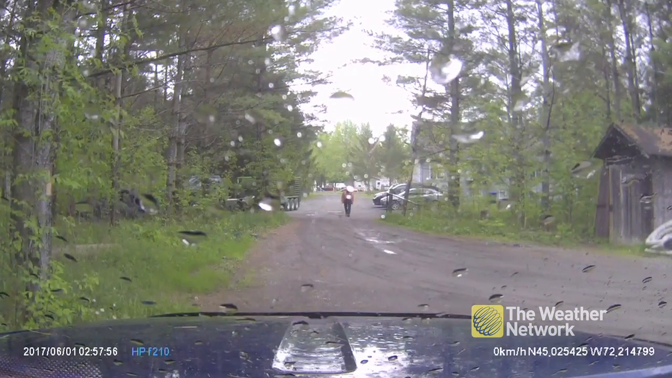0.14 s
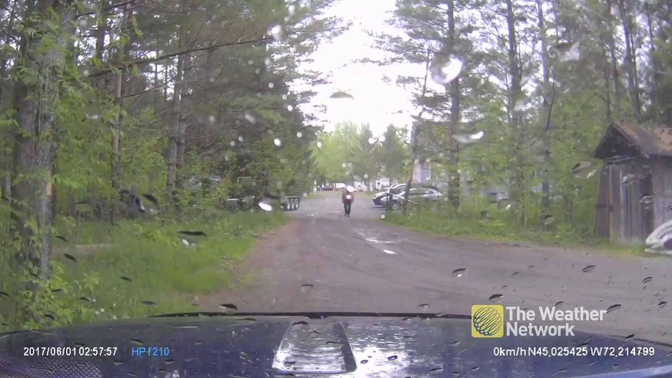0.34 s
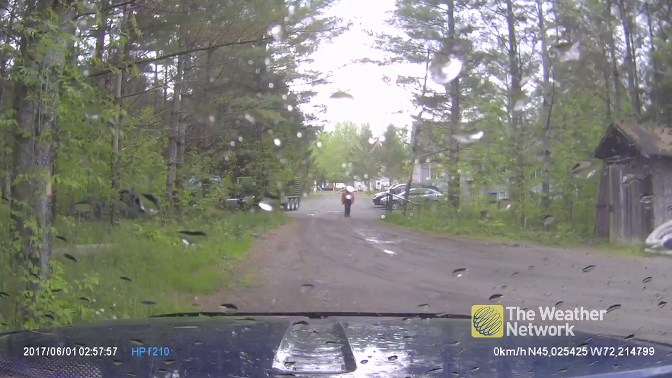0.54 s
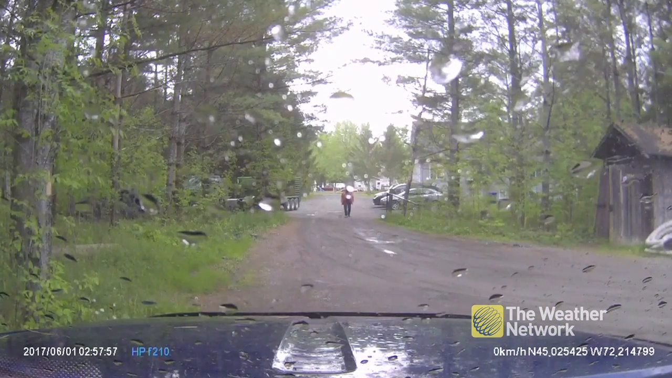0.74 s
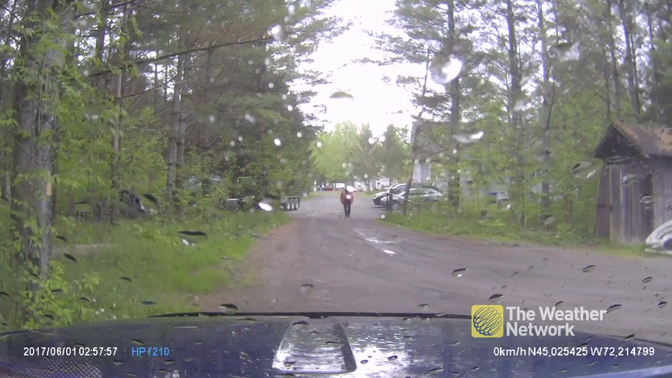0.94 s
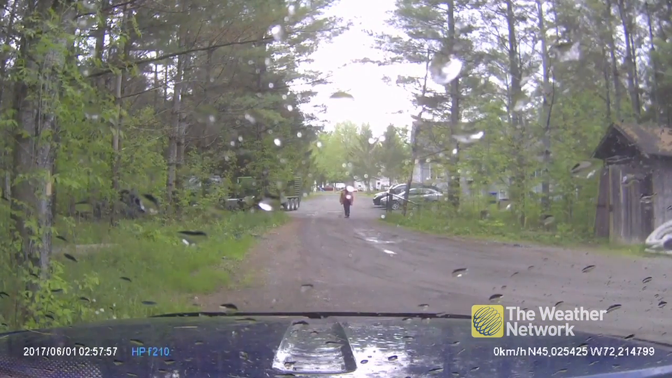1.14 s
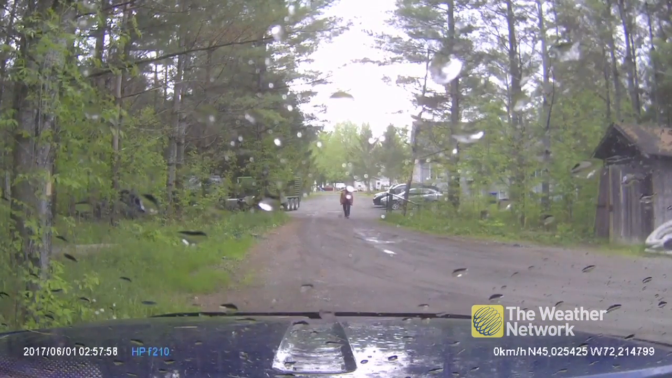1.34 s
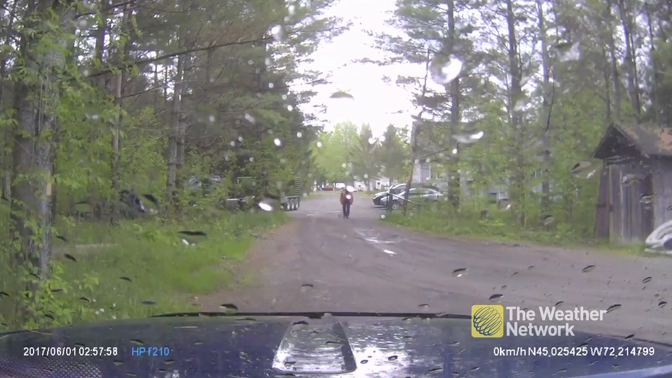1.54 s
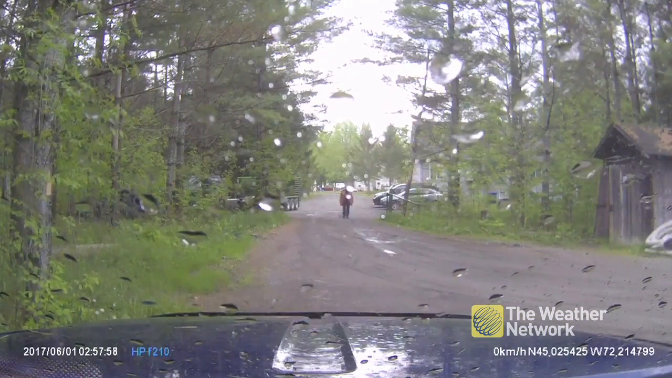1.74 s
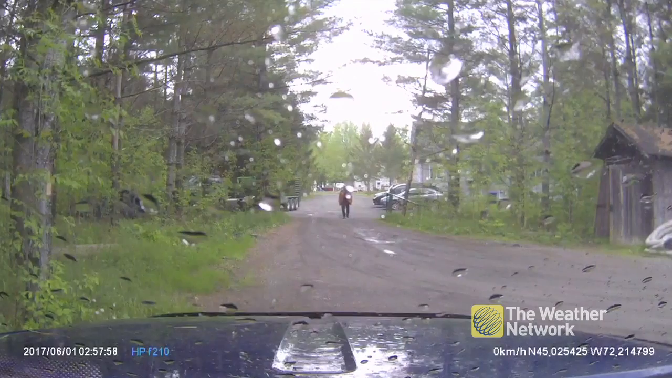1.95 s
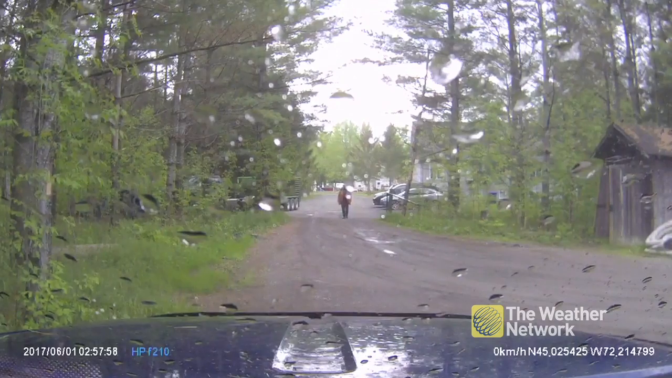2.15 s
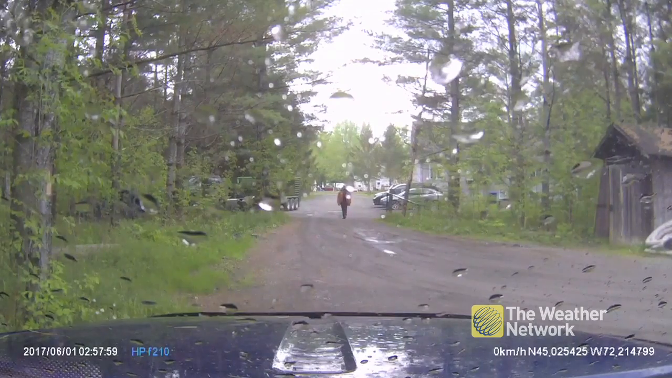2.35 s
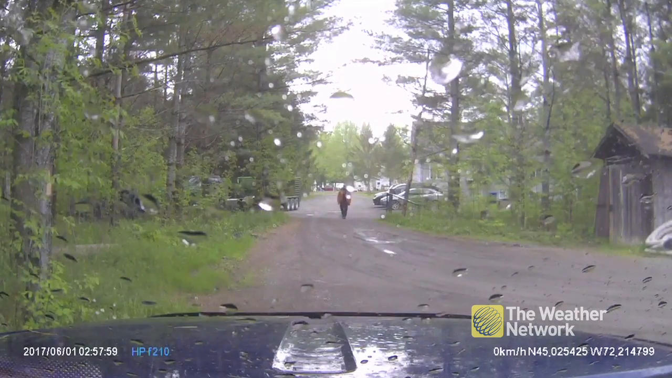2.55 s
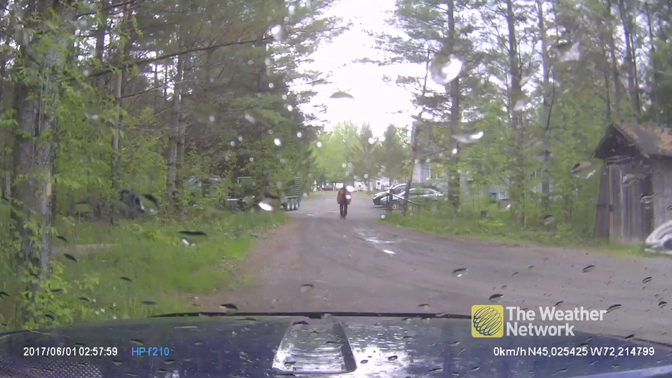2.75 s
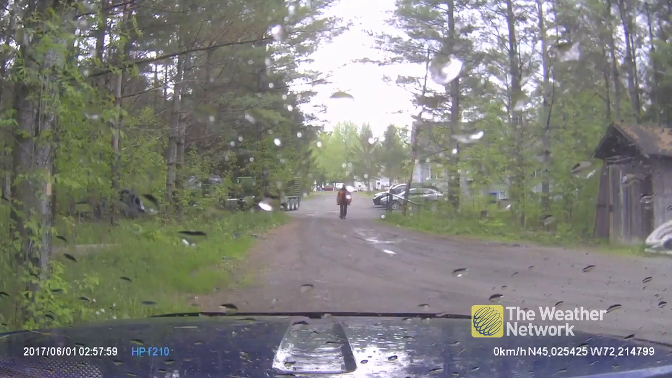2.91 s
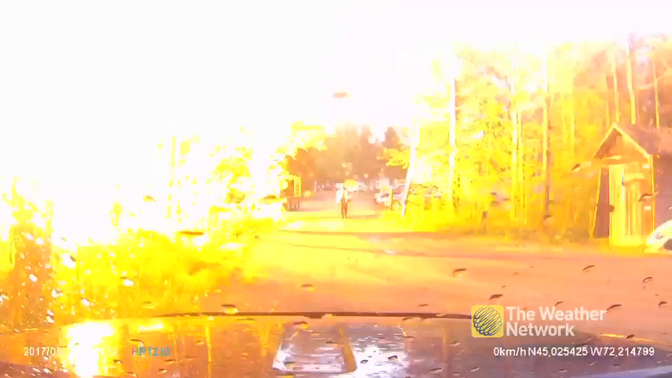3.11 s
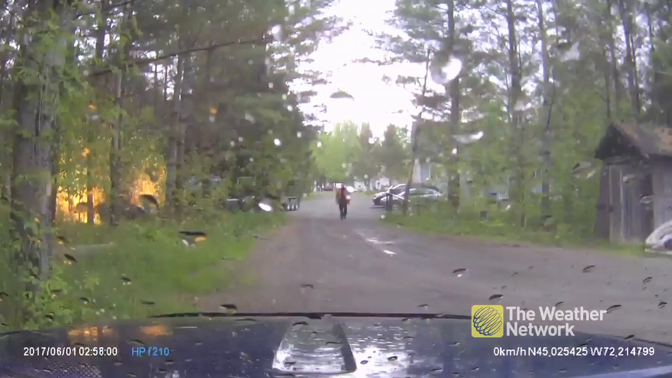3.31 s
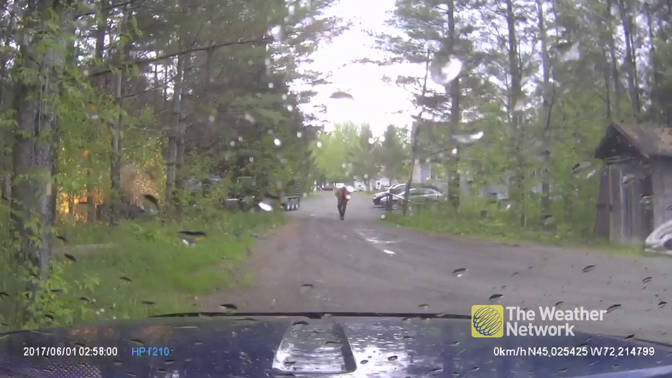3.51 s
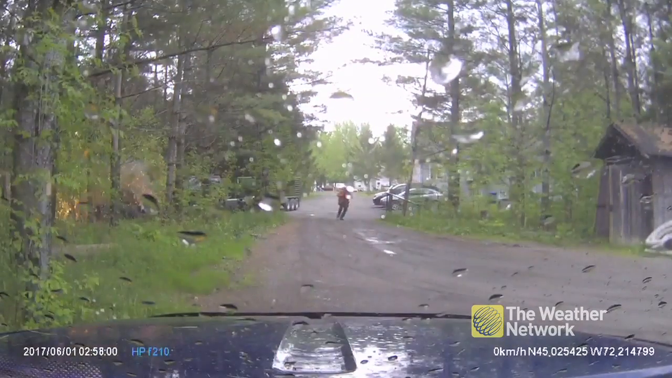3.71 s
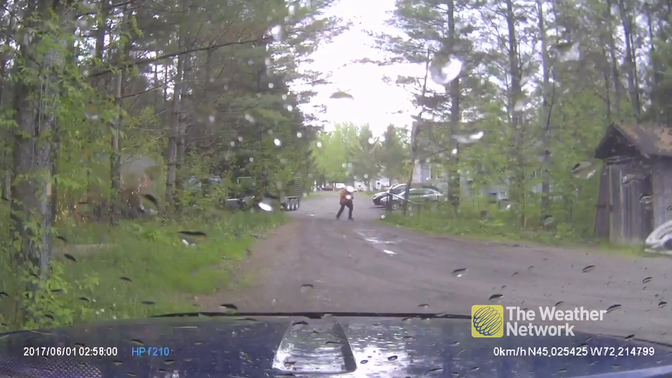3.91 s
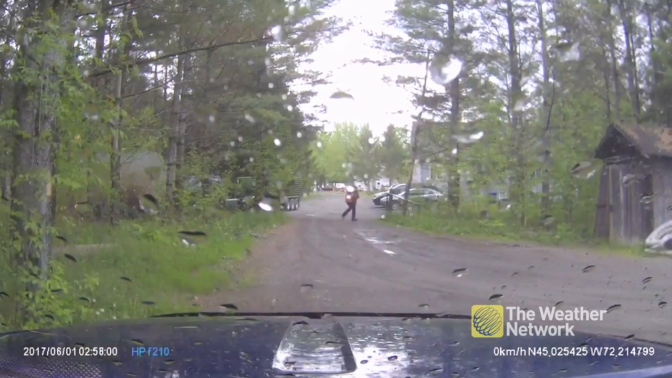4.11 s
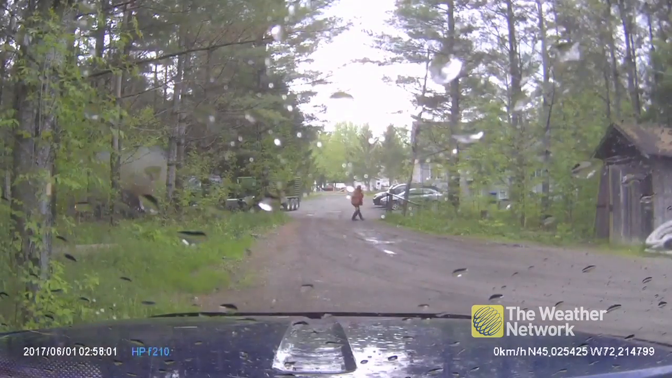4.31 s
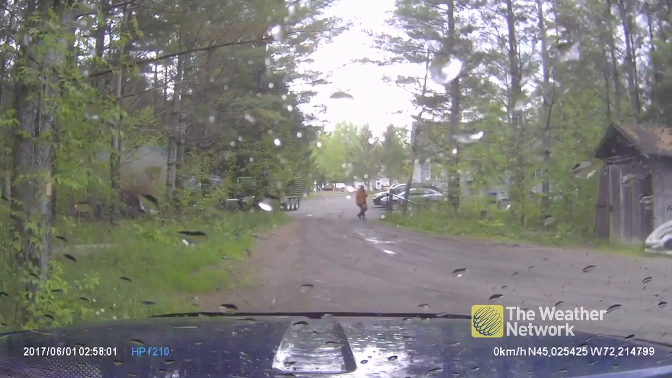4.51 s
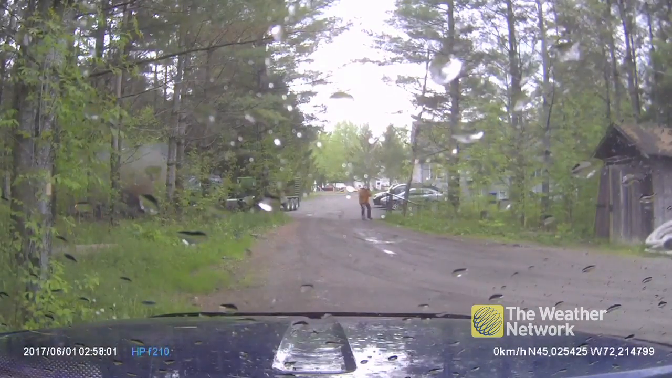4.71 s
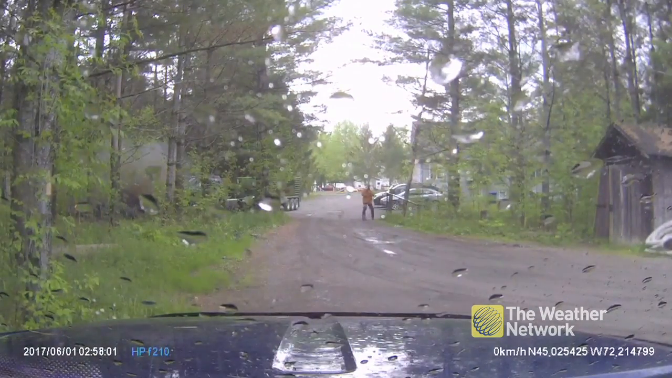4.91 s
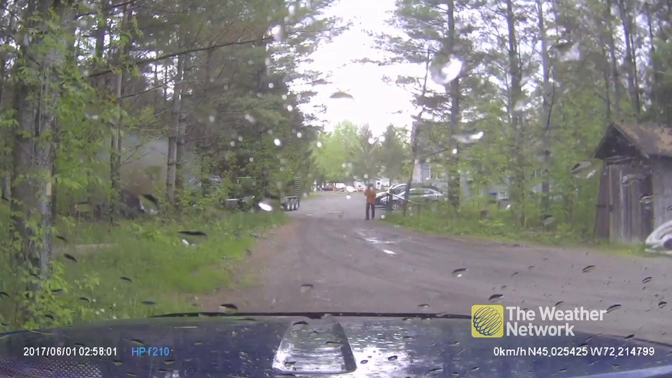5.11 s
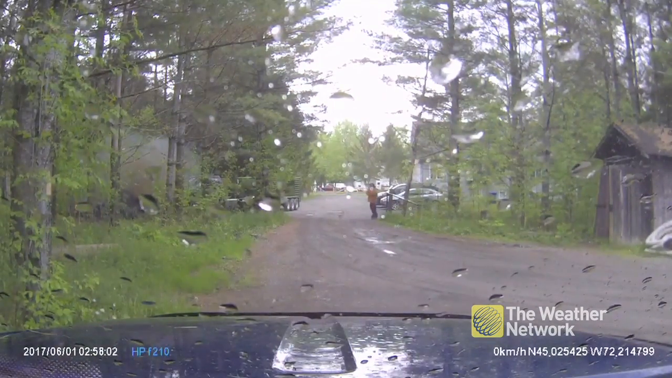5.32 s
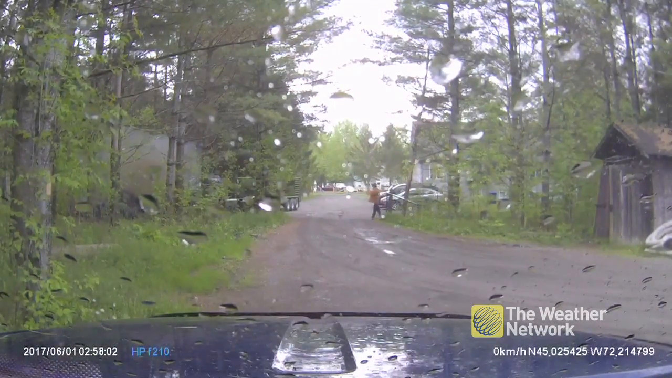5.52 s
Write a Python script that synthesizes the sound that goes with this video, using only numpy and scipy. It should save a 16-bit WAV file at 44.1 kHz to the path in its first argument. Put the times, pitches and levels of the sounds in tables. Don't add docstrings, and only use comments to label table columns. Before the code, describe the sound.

A cheap dashboard microphone in a small car cabin picks up soft rain hiss and scattered ticking drops for three seconds. Lightning strikes close by: a tiny sizzle, then an abrupt clipped blast with broken dropouts. Boxy, rattling thunder fades quickly, rolls back more softly with low thuds, and a few last drops tick through the tail.

```python
import sys
import numpy as np
from scipy import signal
from scipy.fft import rfft, irfft, next_fast_len
from scipy.io import wavfile
from scipy.ndimage import uniform_filter1d, map_coordinates

SR = 44100
rng = np.random.default_rng(int(sys.argv[2]) if len(sys.argv) > 2 else 0)


def unload_audio(sound):
    columns = np.transpose(np.atleast_2d(sound))
    steps = np.round(np.clip(columns, -1, 1) * 32767)
    wavfile.write(sys.argv[1], SR, steps.astype(np.int16))


def boost_factor(decibels):
    exponent = np.asarray(decibels, float) / 20
    return 10 ** exponent


N = 249473

# (frequency [Hz], density [dB per Hz])
DROP_SPECTRUM = [(59, -67), (100, -35), (283, -7.5), (560, -10.5), (1060, -3), (1940, -7.5), (2620, -5.5),
                 (3330, -7), (7270, -17.5), (12000, -34), (15600, -66), (22000, -120)]
# (frequency [Hz], density [dB per Hz])
SHELL_SPECTRUM = [(59, -41), (110, -14.5), (200, -8), (340, -2.5), (580, -3), (950, -1), (1450, -3),
                  (1750, -8.5), (3030, -13), (3350, -15), (4300, -15.5), (4900, -20), (6500, -21),
                  (7500, -31), (15800, -59)]
STRIKE_S = 3.194


def unit(x):
    return x / np.sqrt(np.mean(x ** 2) + 1e-20)


def along(points, hz):
    f, v = np.transpose(points)
    return np.interp(np.log(hz + 1), np.log(f + 1), v)


def wobble(rate):
    knots = rng.standard_normal(int(N * rate / SR) + 4)
    return map_coordinates(knots, [np.arange(N) * rate / SR])


def filtered(x, gain):
    m = next_fast_len(N + 8192)
    return unit(irfft(rfft(x, m) * gain(np.fft.rfftfreq(m, 1 / SR)), m)[:N])


def coloured(x, spectrum):
    return filtered(x, lambda hz: boost_factor(along(spectrum, hz)))


def scattered(per_s, spread_db, t60):
    hit, size = rng.random((2, N))
    power = (hit < per_s / SR) * boost_factor(-2 * spread_db * np.log(size + 0.027))
    fall = boost_factor(-120 * np.arange(SR // 4) / SR / t60)
    envelope = np.sqrt(np.abs(signal.fftconvolve(power, fall)[:N]))
    return unit(envelope * rng.standard_normal(N))


def knocks(events, spectrum, rise_s, mottle_db):
    # (frequency [Hz], t60 [s])
    cabin_t60 = [(150, 0.38), (1000, 0.15), (2700, 0.16), (6000, 0.11), (12000, 0.057)]
    out, length = np.zeros(N + SR), SR // 5
    noise = rng.standard_normal((len(events), length))
    hz, t, z = signal.stft(noise, SR, nperseg=256, noverlap=192)
    mottle = rng.standard_normal((len(events), len(hz)))
    rise = 1 - np.exp(-np.arange(length) / (rise_s * SR))
    t60 = along(cabin_t60, hz)[:, None]
    for k, (s, db, low_db, high_db, ring, panel_hz) in enumerate(events):
        tilt = along([(60, low_db + 20.5), (330, low_db), (750, 0), (1500, 0.0043), (3200, high_db)], hz)
        colour = boost_factor(along(spectrum, hz) + tilt + mottle_db * mottle[k])
        colour = colour * (1 + 1.15 / (1 + ((hz - panel_hz) / 170) ** 2))
        decay = boost_factor(-60 * t / (max(ring, .2) * t60))
        burst = signal.istft(z[k] * colour[:, None] * decay, SR, nperseg=256, noverlap=192)[1][:length]
        burst = rise * burst
        out[round(s * SR):][:length] += boost_factor(db) * burst / np.abs(burst).max()
    return signal.sosfilt(signal.butter(4, 190, "high", fs=SR, output="sos"), out[:N])


def rain():
    # (frequency [Hz], density [dB per Hz])
    hiss_spectrum = [(15, -45), (30, -24), (60, -19), (100, -23), (170, -18), (342, -6.5), (980, -1),
                     (1320, -0.5), (2900, -4), (4500, -6), (6700, -7.5), (7800, -9.5), (14600, -16),
                     (15800, -18)]
    steady = coloured(rng.standard_normal(N), hiss_spectrum)
    patter = coloured(scattered(per_s=60, spread_db=2.5, t60=.12), DROP_SPECTRUM)
    return near_drops() + boost_factor(-65.5) * patter + boost_factor(-54.98 + 0.13 * wobble(6.0)) * steady


def near_drops():
    # (time [s], peak [dB], panel [Hz])
    heavy_drops = [(0.149, -40, 1460), (0.173, -37, 1320), (0.219, -35, 1490), (0.311, -35, 1630),
                   (0.428, -38, 1360), (0.632, -36, 990), (0.674, -37.5, 773), (0.928, -38, 1490),
                   (1.003, -36.5, 1120), (1.159, -35, 1180), (1.259, -34, 830), (1.556, -25.5, 1150),
                   (1.784, -37, 1150), (1.81, -27.5, 1220), (1.85, -36.5, 800), (2.025, -29, 1180),
                   (2.04, -38, 1070), (2.163, -29.5, 1480), (2.188, -44.5, 1080), (2.629, -34, 1284),
                   (2.653, -33.5, 1170), (2.722, -29, 1070), (2.788, -41, 829), (2.824, -35, 1290),
                   (2.968, -40.5, 1290), (2.999, -39.5, 1290), (3.054, -40.5, 1480)]
    # (time [s], peak [dB])
    light_drops = [(0.06, -45), (0.259, -41.5), (0.553, -41.5), (0.61, -43), (0.788, -44), (1.229, -42),
                   (1.619, -47), (1.738, -52), (1.939, -39), (1.964, -46), (2.221, -47), (2.861, -41.5)]
    # (time [s], peak [dB])
    glass_taps = [(0.873, -43), (1.462, -37), (2.27, -42.5), (2.362, -37.5), (2.446, -42.5)]
    # (time [s], treble peak [dB])
    late_drops = [(4.6925, -65), (4.952, -49), (5.1616, -49), (5.254, -50), (5.3523, -48), (5.4158, -42.5),
                  (5.434, -50), (5.5653, -52)]
    # (time [s], peak [dB], panel [Hz])
    roof_thuds = [(2.029, -45, 310), (2.771, -43, 650)]
    sized = heavy_drops + [(s, db, 1150) for s, db in light_drops]
    vary_db = 1.5 * rng.standard_normal((len(sized), 2))
    early = []
    for (s, db, panel_hz), (low_vary, high_vary) in zip(sized, vary_db):
        knock_db = -4.5 - .3 * (db + 35) + low_vary
        splash_db = -3 + 0.13 * (db + 31.5) + high_vary
        early.append((s, db, knock_db, splash_db, 0.86, panel_hz))
    taps = [(s, db, -8, -3, 0.23, 1280) for s, db in glass_taps]
    late = [(s, db + 16.5, -6, 6, .8, 2700) for s, db in late_drops]
    thuds = [(s, db, 8, -14, .8, panel_hz) for s, db, panel_hz in roof_thuds]
    return knocks(early + taps + late + thuds, DROP_SPECTRUM, rise_s=0.0004, mottle_db=1.5)


def whine():
    return boost_factor(-61.5 + 0.38 * wobble(12)) * np.sin(2 * np.pi * 7155 * np.arange(N) / SR)


def leader():
    # (time [s], peak [dB])
    crackles = [(3.135, -35), (3.143, -68), (3.156, -34), (3.168, -35), (3.172, -48)]
    steps = [(s, db - 9, -3, 9, .5, 2700) for s, db in crackles]
    return knocks(steps, SHELL_SPECTRUM, rise_s=.0004, mottle_db=1.5)


def thunder_level():
    # (time [s], level [dB])
    clap = [(3.15, -70), (3.176, -53), (3.182, -28.5), (3.19, -28), (3.194, -10), (3.28, -4.5)]
    # (time [s], level [dB])
    roll = [(3.299, -13.5), (3.5, -17), (3.622, -18), (3.838, -24.5), (3.996, -28), (4.15, -32),
            (4.376, -34), (4.6, -32.5), (5.657, -37.5)]
    s, db = np.transpose(clap + roll)
    return np.interp(np.arange(N) / SR, s, db)


def thunder(level_db):
    train = scattered(per_s=400, spread_db=0.5, t60=0.22)
    roll = boost_factor(level_db + 0.61 * wobble(24.97)) * coloured(train, SHELL_SPECTRUM)
    hz, t, z = signal.stft(roll + peals(), SR, nperseg=256)
    treble_db = 5 - 6 * np.log2(1 + np.maximum(t - STRIKE_S, 0) / 0.24)
    treble_db = treble_db + np.select([t < STRIKE_S, t < 3.29], [5.5, -3.5])
    slope = np.clip((hz[:, None] - 1200) / 3800, 0, 2.4) ** 0.88
    dulled = signal.istft(z * boost_factor(treble_db * slope), SR, nperseg=256)[1][:N]
    return causal(dulled, lambda hz: resonances(hz, depth=0.55)) * np.std(dulled)


def peals():
    # (time [s], peak [dB], panel [Hz])
    shocks = [(3.486, -7.5, 1230), (3.633, -9, 905), (3.879, -11, 1000), (3.899, -10, 428),
              (3.962, -18, 1280), (4.218, -23, 1250), (4.264, -28.5, 1310), (4.344, -26.5, 1210),
              (4.377, -24.5, 1290), (4.392, -25, 1010), (4.444, -35, 1250), (4.579, -36, 700),
              (4.8, -19, 815), (4.819, -16.5, 1380), (4.868, -16.5, 1020), (4.911, -19.5, 1240),
              (4.94, -17, 950), (4.984, -13, 1210), (5.001, -12.5, 417), (5.024, -21, 656),
              (5.125, -27, 1260), (5.151, -26, 885), (5.209, -20.5, 312), (5.234, -24.5, 760),
              (5.376, -16, 636), (5.42, -25, 296), (5.469, -28.5, 474), (5.548, -26, 538),
              (5.576, -27.5, 363), (5.633, -24, 312)]
    s, db, panel_hz = np.transpose(shocks)
    octaves_down = np.log2(1250 / panel_hz)
    far = s > 4.7
    low_db = np.minimum(-17 + 13.5 * octaves_down + 13.5 * far, 5.5)
    high_db = 3 - 2.5 * octaves_down - 5 * far
    ring = 0.96 - 0.14 * octaves_down
    blows = np.transpose([s, db + 1.0, low_db, high_db, ring, panel_hz])
    return knocks(blows, SHELL_SPECTRUM, rise_s=0.0014, mottle_db=5.0)


def resonances(hz, depth):
    # (frequency [Hz], width [Hz], level [dB])
    modes = [(316, 23, 3), (424.5, 26, 1), (683, 53, 0.5), (856, 110, 2), (1006, 50, 3), (1249, 52, 9.5),
             (1490, 19, 8), (2720, 600, 8), (3050, 120, 5.5)]
    return 1 + depth * sum(boost_factor(db) / (1 + (2 * (hz - centre) / width) ** 2) for centre, width, db in modes)


def causal(x, gain):
    m = 2 * next_fast_len(N // 2 + 4096)
    cepstrum = irfft(np.log(gain(np.fft.rfftfreq(m, 1 / SR))), m)
    cepstrum[1:m // 2] *= 2
    cepstrum[m // 2 + 1:] = 0
    return unit(irfft(rfft(x, m) * np.exp(rfft(cepstrum)), m)[:N])


def rumble(level_db):
    # (frequency [Hz], density [dB per Hz])
    boom_spectrum = [(8.8, -46.5), (15, -23), (43, -16), (75, -8.5), (108, -31), (200, -12.5), (260, -25),
                     (440, -120)]
    far_db = 9.5 * np.maximum(np.arange(N) / SR - 4.1, 0)
    boom = coloured(rng.standard_normal(N), boom_spectrum)
    return boost_factor(level_db - 37.5 + far_db + 3.3 * wobble(4.32)) * boom


def scene():
    gain = boost_factor(-9.5 * (np.arange(N) / SR > 3.097))
    level_db = thunder_level()
    mono = gain * (rain() + whine()) + leader() + thunder(level_db) + rumble(level_db)
    return np.array([mono, mono])


def top_cut(x):
    return signal.sosfilt(signal.butter(12, 16620, fs=SR, output="sos"), x)


def record(dry):
    # (start [s], end [s], rail [-1..1], leak [dB])
    pinned = [(3.1939, 3.2007, -.8, -36), (3.2029, 3.2041, -.8, -20), (3.2063, 3.2188, 1, -46),
              (3.2190, 3.2208, -.4, -34), (3.2222, 3.2237, 1, -20), (3.2270, 3.2386, -.8, -56),
              (3.2391, 3.2423, .4, -30), (3.2452, 3.2468, -.3, -24), (3.2484, 3.2507, -.9, -28),
              (3.2521, 3.2654, .7, -80), (3.2659, 3.2694, -1, -22), (3.2840, 3.2917, -.2, -26)]
    top, hardness, t = .37, 4, np.arange(N) / SR
    x = dry / (1 + np.abs(dry / top) ** hardness) ** (1 / hardness)
    fizz = [filtered(rng.standard_normal(N), lambda hz: np.clip(hz / 7000, 0, 1) ** 3) for channel in x]
    loudness = uniform_filter1d(np.abs(x[0]), size=1024)
    x = x + boost_factor(-36.5) * np.array(fizz) * loudness
    leak_db, rails = np.zeros((2, N))
    for start, end, rail, db in pinned:
        span = slice(round(start * SR), round(end * SR))
        since = t[span] - start
        leak_db[span] = db
        sag = np.exp(-since / .0005) - .9 * np.exp(-since / .00015) - .1 * np.exp(-since / .0012)
        rails[span] = 2.1 * rail * top * sag
    x = x * uniform_filter1d(boost_factor(leak_db), size=11) + rails
    x = signal.sosfiltfilt(signal.butter(12, 15800, fs=SR, output="sos"), x)
    return top_cut(x)


dry = scene()
out = record(dry)
unload_audio(out)
```